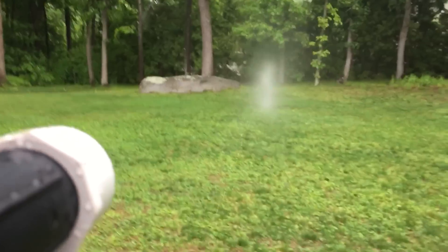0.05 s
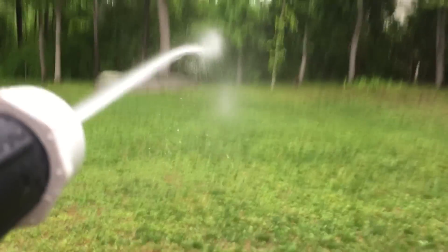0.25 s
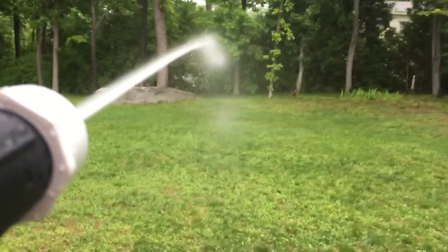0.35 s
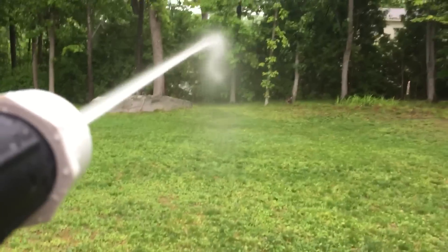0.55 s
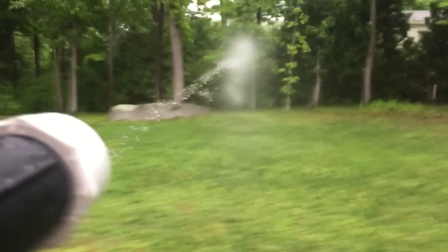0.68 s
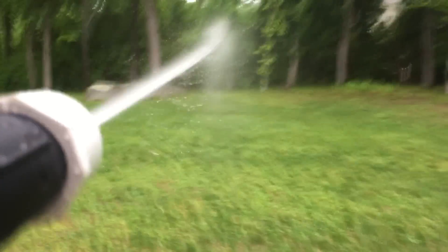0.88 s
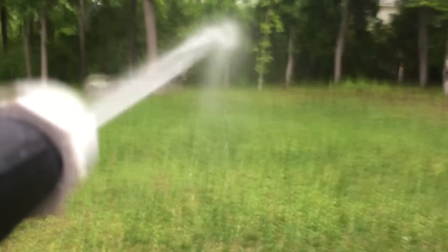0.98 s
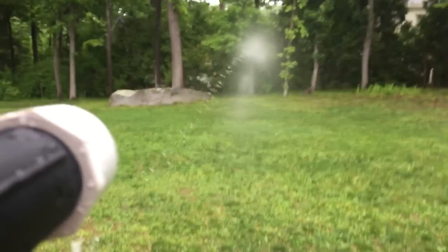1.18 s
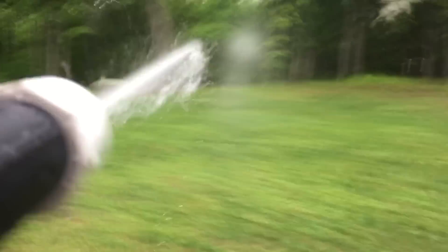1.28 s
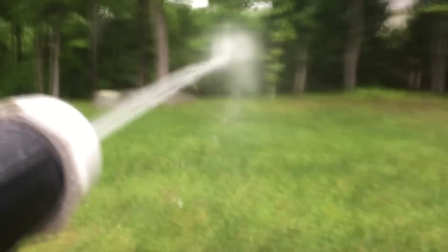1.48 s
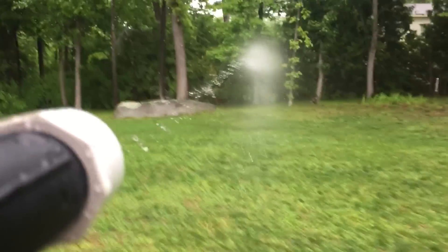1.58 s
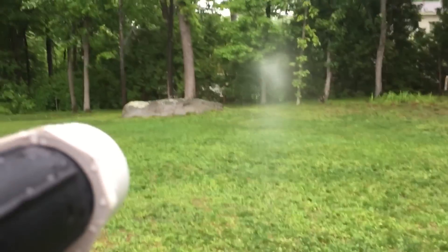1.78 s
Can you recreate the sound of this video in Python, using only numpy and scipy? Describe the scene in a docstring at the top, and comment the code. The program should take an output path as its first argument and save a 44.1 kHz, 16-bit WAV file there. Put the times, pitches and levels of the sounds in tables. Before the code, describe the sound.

A hose nozzle close to the microphone shoots three short, hissing jets of water at about 0.2, 0.9 and 1.4 seconds. Each lasts a tenth of a second, with a soft thud and sharp drop clicks as it shuts. Spray patters more quietly on the grass after each, with small splats and hollow plops around 0.7, 1.15 and 1.55 seconds, fading into faint outdoor air by 1.8 seconds.

```python
"""On a lawn, a hose nozzle close to the microphone fires three short jets of water.
Each jet hisses through the nozzle's resonances, thuds softly and spits sharp drops as it shuts.
The spray then patters on the grass, with a few splats and hollow plops, over quiet outdoor air."""
import sys
import numpy as np
from scipy import signal
from scipy.fft import rfft, irfft
from scipy.io import wavfile

SR = 44100
rng = np.random.default_rng(int(sys.argv[2]) if len(sys.argv) > 2 else 0)


def dump(signal):
    """Clip the signal to [-1, 1] and save it as 16-bit WAV at the path in sys.argv[1]."""
    limited = np.clip(np.atleast_2d(signal).T, -1, 1)
    pcm = np.round(limited * 32767).astype(np.int16)
    wavfile.write(sys.argv[1], SR, pcm)


N = 81585


def amp(db):
    """Decibels to gain."""
    return 10 ** (np.asarray(db) / 20)


def unit(x):
    """Scales to rms 1."""
    return x / np.sqrt(np.mean(x ** 2) + 1e-20)


def shape(points, hz):
    """Gain of a (Hz, dB) table on a log-frequency axis."""
    f, db = np.transpose(points)
    return amp(np.interp(np.log(hz + 1), np.log(f), db))


def colour(x, points):
    """Filters x by a (Hz, dB) table; rms 1."""
    return unit(irfft(rfft(x) * shape(points, np.fft.rfftfreq(len(x), 1 / SR)), len(x)))


def octaves(hz):
    """Octaves above the middle of the hiss, held constant in the bass."""
    return np.log2(np.maximum(hz, 500) / 4000)


def seconds(size):
    """Time axis of size samples."""
    return np.arange(size) / SR


def add(mix, start, sound):
    """Mixes a sound in at start seconds."""
    part = mix[max(round(start * SR), 0):][:len(sound)]
    part += sound[:len(part)]


def fizz_band(t, hz, width):
    """Noise around hz, width octaves to each side; rms 1."""
    away = np.log2((np.fft.rfftfreq(len(t), 1 / SR) + 1) / hz) / width
    return unit(irfft(rfft(rng.standard_normal(len(t))) / (1 + away ** 2)))


# Resonances of the nozzle: (frequency [Hz], width [Hz], level [dB])
NOZZLE_MODES = [(830, 190, -9.5), (1230, 286, -2.5), (2115, 187, 1.5), (2450, 130, -2.5), (3398, 243, 3),
                (4350, 230, -14), (5504, 300, -3), (6095, 510, -4.5), (7150, 400, -9), (8550, 200, -17),
                (9590, 520, -9), (11700, 490, -14.5), (13650, 500, -13.5), (14950, 320, -19)]
# Broad hiss of the jet, heard close up: (frequency [Hz], level [dB])
HISS_SPECTRUM = [(40, -24), (150, -23), (350, -35.5), (620, -14.5), (1500, -13.5), (2750, -26),
                 (4000, -12.5), (8200, -19), (11000, -32.5), (16000, -33.5)]
# Jets fired close to the microphone: (time [s], open for [s], level [dB], sag until shut-off [dB],
# brightness [dB/octave], nozzle ring [dB], ring pitch [ratio])
JETS = [(0.2145, 0.097, -14, 14.5, 0.65, -3.5, 1), (0.9059, 0.092, -14, 16, 0.27, -2, 0.99),
        (1.3614, 0.089, -14, 16.5, 0.5, -1.5, 0.989)]


def jet(open_s, db, sag_db, bright_db, ring_db, pitch):
    """Sputtering turbulence rings the nozzle; the low body builds later and sags more than the edge."""
    body_hz, sputter_hz = 4150, 350
    body_attack_s, edge_attack_s, shut_db_per_s = 0.01, 0.0059, 997
    t = seconds(8192)
    hz = np.fft.rfftfreq(len(t), 1 / SR)
    power = shape(HISS_SPECTRUM, hz) ** 2
    for mode_hz, width, mode_db in NOZZLE_MODES:
        detuning = (hz - pitch * mode_hz) / (0.83 * width)
        power += (amp(mode_db + ring_db) / (1 + detuning ** 2)) ** 2
    turbulence = np.exp(2j * np.pi * rng.random(len(hz)))
    hiss = unit(irfft(turbulence * np.sqrt(power) * amp(bright_db * octaves(hz))))
    body = irfft(rfft(hiss) / (1 + (hz / body_hz) ** 8))
    edge = hiss - body
    sputter = unit(irfft(rfft(rng.standard_normal(len(t))) / (1 + (hz / sputter_hz) ** 2)))
    fall_db = sag_db * (t / open_s) ** 2.84
    flow = body * np.minimum(t / body_attack_s, 1) * amp(-fall_db)
    flow += edge * np.minimum(t / edge_attack_s, 1) * amp(-0.77 * fall_db)
    shut_db = shut_db_per_s * np.maximum(t - open_s, 0)
    return flow * np.exp(0.14 * sputter) * amp(db - shut_db)


# Soft thuds under the jets, probably the valve closing: (time [s], level [dB])
THUDS = [(0.261, -30), (0.289, -27), (0.95, -22.5), (0.976, -29.5), (1.048, -33.5), (1.403, -27.5)]


def thud(db, hz=87.8, rise_s=0.0049):
    """A heavily damped low swing."""
    t = seconds(4096)
    return amp(db) * t / rise_s * np.exp(1 - t / rise_s) * np.sin(2 * np.pi * hz * t)


# Sharp drops, loudest around each shut-off: (time [s], level [dB], centre [Hz], knock [dB])
DROP_SNAPS = [(0.2771, 4.5, 8700, -15), (0.2869, -2.5, 7700, -8), (0.2916, -2, 11000, -18),
              (0.296, -16, 11000, -10), (0.3026, -3, 10100, -18), (0.308, -13, 7000, -12),
              (0.334, -10, 10500, -9), (0.3346, -10, 10700, -9), (0.3385, -6.5, 11400, -12),
              (0.3401, -6.5, 11000, -16), (.496, -5, 11800, -14), (0.5733, -18, 10900, -3),
              (0.6381, -6.5, 8750, -6), (.6432, -18, 7500, -3), (0.6502, -14, 8800, -11),
              (0.655, -15, 9800, -8), (0.6695, -17, 11100, -16), (.7356, -9, 11500, -11),
              (0.9639, -6, 8800, -2), (0.9666, 0, 10500, -11), (0.9741, 3.5, 7350, -12),
              (1.0217, -16, 9600, -7), (1.153, -15, 9050, -22), (1.1927, -13, 7200, -12),
              (1.4768, -4.5, 10100, -12), (1.5044, -4.5, 8100, -10), (1.5553, -12, 10500, -17),
              (1.606, -15, 8200, -14), (1.612, -18, 8150, -24.5)]


def snap(db, hz, knock_db):
    """A drop bursts: a cycle or two of treble, a small knock and a millisecond of fizz."""
    crack_s, knock_s, fizz_s, knock_hz = 0.00006, 0.00029, 0.0012, 3690
    t = seconds(512)
    crack = np.exp(-t / crack_s) * np.sin(2 * np.pi * hz * t)
    crack = signal.lfilter([1, -0.68], 1, crack)  # thins out the lows
    knock = amp(knock_db) * np.exp(-t / knock_s) * np.sin(2 * np.pi * knock_hz * t)
    fizz = amp(-11.5) * fizz_band(t, hz, width=0.51) * np.exp(-t / fizz_s)
    return amp(db) * (1.83 * crack / np.linalg.norm(crack) - knock + fizz)


# Colour of droplets on grass: (frequency [Hz], level [dB])
PATTER_SPECTRUM = [(60, -17), (200, -8.5), (450, -3), (1200, -1.5), (3600, 1), (4900, -1), (6200, 1.5),
                   (8000, 2), (9400, 5), (10600, -1), (16000, -0.5)]
# Low rumble that comes with the spray: (frequency [Hz], level [dB])
RUMBLE_SPECTRUM = [(20, -37), (55, 4.5), (110, -3.5), (220, -2.5), (400, -19), (2000, -62)]
# Spray landing across the lawn: (time [s], level [dB], brightness [dB/octave])
SPRAY_FALL = [(0, -52.5, 4), (.07, -60, 7), (.11, -75.5, 7), (.21, -56.5, -6.5), (.31, -36.5, -2),
              (.42, -37.5, -1), (.53, -33.5, -1), (0.692, -34, -1.5), (0.702, -26, -3), (.74, -30, -1.4),
              (.80, -38, 0.5), (.88, -48.5, -0.5), (1.0, -35.5, -2.5), (1.08, -38, -0.5),
              (1.122, -28.5, -2), (1.191, -34.5, -0.5), (1.24, -41.5, 0.8), (1.335, -55.5, -0.5),
              (1.45, -34.5, -2.5), (1.533, -36, -0.5), (1.555, -25.5, -2), (1.59, -33.5, -0.5),
              (1.619, -34, -0.5), (1.69, -45, -0.5), (1.755, -50, 3), (1.80, -69, 3.5), (1.85, -65, -4)]


def spray(drops_per_s=8000, spread_db=4.5, wash_share=0.56):
    """Thousands of droplets patter on grass; heavy water sounds duller, the last mist brighter."""
    when, db, bright_db = np.transpose(SPRAY_FALL)
    sizes = amp(spread_db * np.minimum(rng.exponential(1, N), 5)) * rng.choice([-1, 1], N)
    drops = unit(sizes * (rng.random(N) < drops_per_s / SR))
    wash = rng.standard_normal(N)
    patter = colour(np.sqrt(1 - wash_share) * drops + np.sqrt(wash_share) * wash, PATTER_SPECTRUM)
    hz, t, frames = signal.stft(patter, SR, nperseg=256)
    tilt = amp(octaves(hz)[:, None] * np.interp(t, when, bright_db))
    patter = signal.istft(frames * tilt, SR)[1][:N]
    level_db = np.interp(seconds(N), when, db)
    rumble_db = -12 + 0.46 * np.minimum(level_db + 24, 0)  # fades faster than the patter
    rumble = amp(rumble_db) * colour(rng.standard_normal(N), RUMBLE_SPECTRUM)
    return (patter + rumble) * amp(level_db)


# Hollow ring at the start of a plop: (frequency [Hz], level [dB], rise [s])
CAVITY_MODES = [(973, -6, 0.0015), (620, -10, 0.0016)]
# Plops out on the lawn: (time [s], level [dB], swing pitch [ratio], swing decay [s], ring pitch [ratio])
PLOPS = [(0.7006, -26.5, 1.53, 0.022, 0.92), (0.7143, -15.5, 1.2, 0.0066, 0.985),
         (0.761, -30, 1.05, 0.011, 0.83), (1.1089, -22.5, 1.2, 0.0055, 0.594),
         (1.1908, -14.5, 1.15, 0.0087, 1.036), (1.542, -21, 0.87, 0.0042, 0.96),
         (1.5521, -12.5, 1.15, 0.0094, 1.015), (1.6021, -23, 1.05, 0.011, .97)]


def plop(db, swing_pitch, decay_s, ring_pitch):
    """A slug of water: a brief hollow ring, then a low swing that dives in pitch."""
    delay_s, dive_s = 0.00437, 0.0034
    t = seconds(4096)
    sound = sum(amp(mode_db) * t / rise * np.exp(1 - t / rise) * np.sin(2 * np.pi * ring_pitch * hz * t)
                for hz, mode_db, rise in CAVITY_MODES)
    swing_hz = swing_pitch * (53 + 208 * np.exp(-t / dive_s))
    swing = np.exp(-t / decay_s) * np.sin(2 * np.pi * np.cumsum(swing_hz) / SR)
    add(sound, delay_s, swing)
    return amp(db) * sound


# Clumps landing on the grass: (time [s], level [dB], centre [Hz], half-width [octaves], decay [s])
SPLATS = [(0.697, -28.5, 2800, 0.35, .005), (0.697, -25.5, 5500, .14, 0.0015),
          (.705, -30.5, 960, 0.19, 0.011), (0.7278, -28, 5500, 2.1, 0.0079),
          (1.109, -38, 1030, 0.17, 0.014), (1.5398, -31, 2000, 2, 0.004)]


def splat(db, hz, width, decay_s, rise_s=0.0017):
    """A clump of water bursts into a short splash: a crisp tick when small, a dull slap when large."""
    t = seconds(4096)
    envelope = np.minimum(t / rise_s, 1) * np.exp(-np.maximum(t - rise_s, 0) / decay_s)
    return amp(db) * fizz_band(t, hz, width) * envelope


# Open air all around the microphone: (frequency [Hz], level [dB])
AIR_SPECTRUM = [(20, -4), (90, 5.5), (300, -4.5), (550, -1.5), (900, 1.5), (2300, -1.5), (4000, -4.5),
                (8000, -16), (16000, -29)]


def outdoor_air(db=-60):
    """A faint, steady wash of noise with little treble."""
    return amp(db) * colour(rng.standard_normal(N), AIR_SPECTRUM)


def scene():
    """Nozzle and lawn from one microphone position, dry in the open air."""
    mix = spray() + outdoor_air()
    events = (jet, JETS), (thud, THUDS), (plop, PLOPS), (splat, SPLATS), (snap, DROP_SNAPS)
    for source, table in events:
        for start, *settings in table:
            add(mix, start, source(*settings))
    return mix[None]


def record(dry, ceiling=0.88, cutoff_hz=15850):
    """The sharpest drop peaks are limited to stay below full scale, then the highest treble is cut."""
    lowpass = signal.firwin(511, cutoff_hz, window=("kaiser", 8), fs=SR)
    return signal.oaconvolve(np.clip(dry, -ceiling, ceiling), lowpass[None], "same")


dry = scene()
out = record(dry)
dump(out)
```